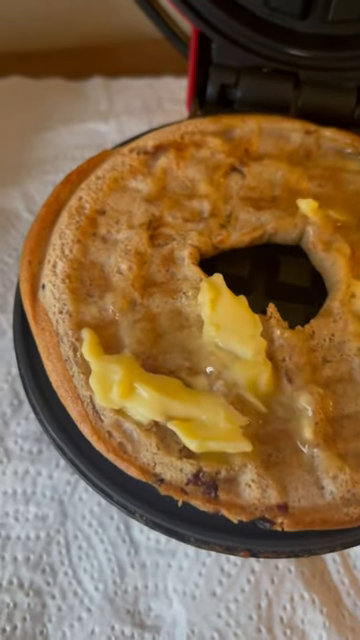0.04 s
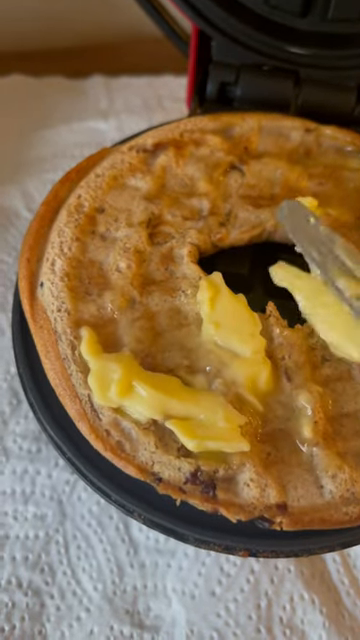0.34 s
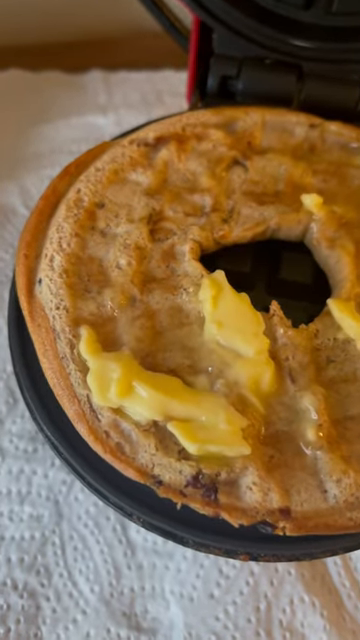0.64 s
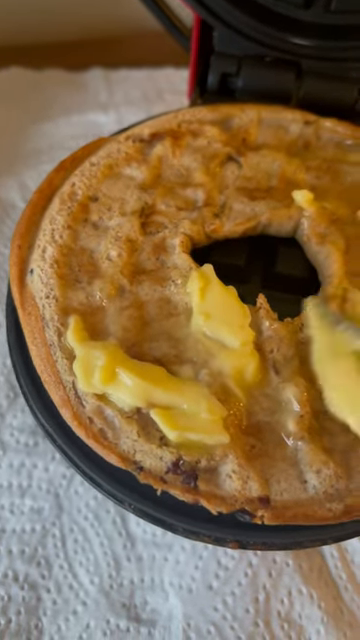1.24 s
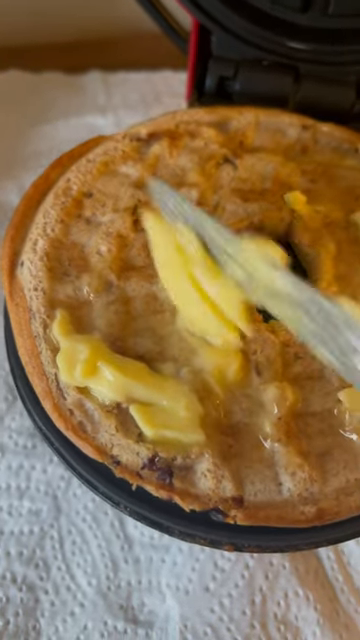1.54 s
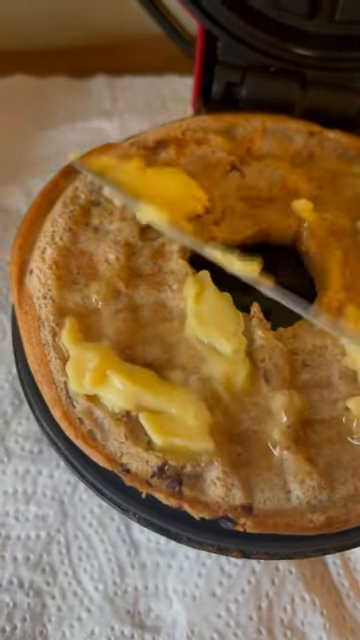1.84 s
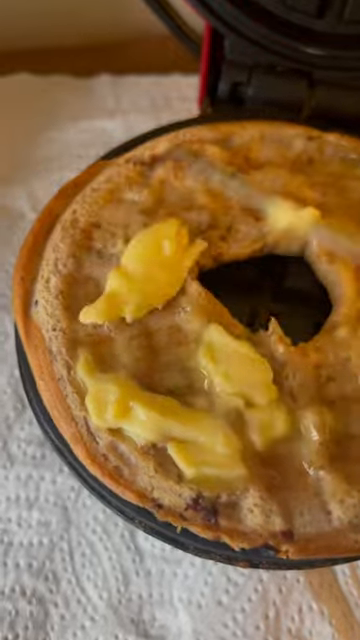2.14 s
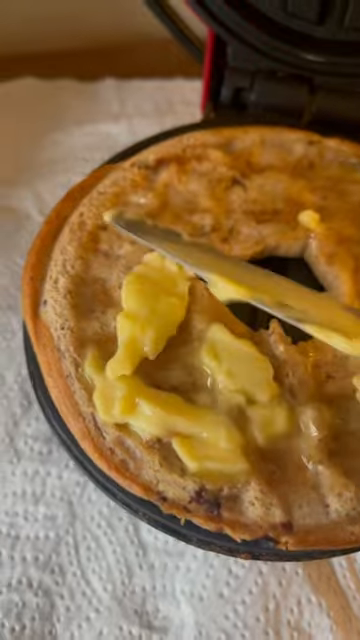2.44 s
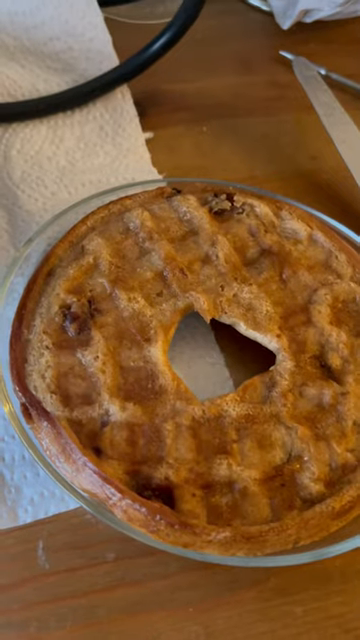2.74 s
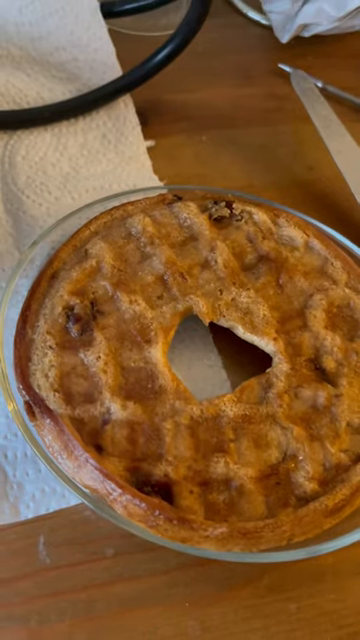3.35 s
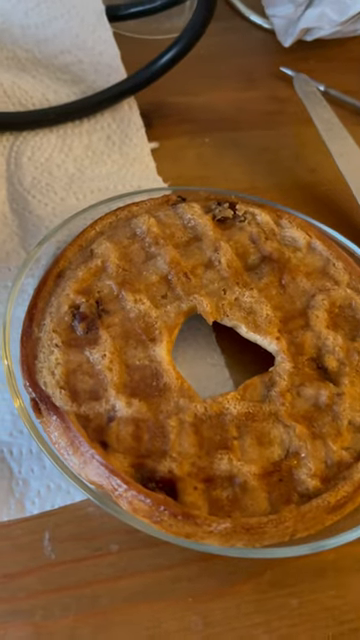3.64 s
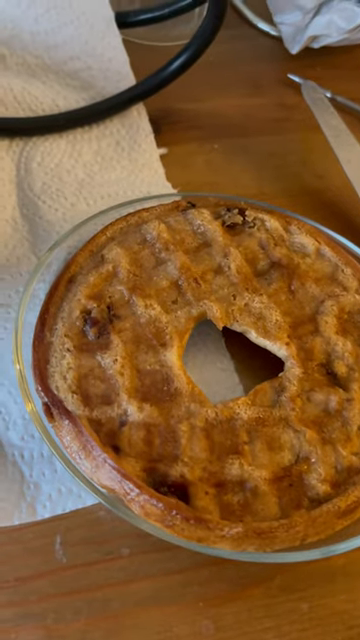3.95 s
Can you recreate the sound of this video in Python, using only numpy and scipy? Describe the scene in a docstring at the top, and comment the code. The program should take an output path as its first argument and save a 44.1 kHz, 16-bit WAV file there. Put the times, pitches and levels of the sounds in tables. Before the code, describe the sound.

Close in a quiet kitchen, a knife slides softly over a toasted bagel, then catches the crust in short crackling scrapes and small thuds. A low background hum stops, leaving faint rumble, light taps and a click.

```python
"""A small quiet kitchen, close up: a knife spreads butter over a crisp toasted bagel.
After a soft slide the blade catches the crust in short crunches and snaps; each break crackles,
thuds into the bagel and sets blade and pan ringing. Pan and table give a few dull bumps.
A low hum cuts off with a faint tick, leaving a soft rumble, a few light taps and one sharp click."""
import sys
import numpy as np
from scipy import signal
from scipy.fft import rfft, irfft
from scipy.io import wavfile

SR = 44100
rng = np.random.default_rng(int(sys.argv[2]) if len(sys.argv) > 2 else 0)


def unload_audio(sound):
    """Save the sound as a 16-bit wav file, at the path given as the first command line argument."""
    columns = np.transpose(np.atleast_2d(sound))
    # keep every value between -1 and 1, then stretch to whole-number steps
    steps = np.round(np.clip(columns, -1, 1) * 32767)
    wavfile.write(sys.argv[1], SR, steps.astype(np.int16))


N = 176400

# bright spectrum of breaking crust (frequency [Hz], level [dB])
CRUST_COLOUR = [(30, -41), (600, 2), (1000, 4), (1500, -2), (2300, 4), (4000, -2), (6300, 4), (8800, -1.5),
                (10400, 4), (11500, -6), (13800, -34.5)]
# spectrum of the blade's friction (frequency [Hz], level [dB])
FRICTION_COLOUR = [(30, -15), (150, 14.5), (700, -4), (4700, -1.5), (6200, 4), (8200, -1), (10500, -4),
                   (13000, -49)]
# spectrum of the room's soft air noise (frequency [Hz], level [dB])
AIR_COLOUR = [(400, -6.5), (650, 9), (1000, -14.5), (1500, -22.5), (10000, -27.5), (12400, -40),
              (13400, -63)]
SNAP_DECAY_S, SNAP_RISE_S = 0.00032, 0.00043
SNAP_GAIN = np.sqrt(0.0012 * SR)  # a snap carries the energy of 1.2 ms at its listed level


def amp(db):
    """Decibels to gain."""
    return 10 ** (np.asarray(db) / 20)


def unit_rms(x):
    """Scales to rms 1."""
    return x / np.sqrt(np.mean(x ** 2) + 1e-20)


def unit_energy(x):
    """Scales to energy 1."""
    return x / np.sqrt(np.sum(x ** 2) + 1e-20)


def curve_at(points, hz):
    """Reads a table on a log-frequency axis."""
    f, value = np.transpose(points)
    return np.interp(np.log(hz + 1), np.log(f + 1), value)


def add(mix, start_s, sound):
    """Mixes a sound in at a time."""
    part = mix[round(start_s * SR):][:len(sound)]
    part += sound[:len(part)]


def colour(points, tilt_db=0, size=2048):
    """Minimum-phase impulse response of a spectrum, tilted per octave above 800 Hz."""
    hz = abs(np.fft.fftfreq(size, 1 / SR))
    octaves = np.log2(np.maximum(hz, 800) / 800)
    log_gain = np.log(amp(curve_at(points, hz) + tilt_db * octaves))
    return unit_energy(np.fft.ifft(np.exp(np.conj(signal.hilbert(log_gain)))).real)


def excite(force, points, tilt_db=0):
    """A force played through a material's colour, with energy 1."""
    return unit_energy(signal.fftconvolve(force, colour(points, tilt_db)))


def noise(points):
    """Steady noise of a given colour, rms 1."""
    gain = amp(curve_at(points, np.fft.rfftfreq(N, 1 / SR)))
    return unit_rms(irfft(rfft(rng.standard_normal(N)) * gain, N))


def burst(decay_s, rise_s=1 / SR):
    """A dying puff of noise with energy 1."""
    t = np.arange(SR // 8) / SR
    return unit_energy(rng.standard_normal(len(t)) * np.minimum(t / rise_s, 1) * np.exp(-t / decay_s))


def grains(size, per_s=3200, spread_db=4):
    """Tiny fractures of very uneven strength."""
    strength = amp(spread_db * np.minimum(rng.exponential(1, size), 4))
    return strength * rng.choice([-1, 1], size) * (rng.random(size) < per_s / SR)


def stick_slip(size, depth_db=2.5, step_s=0.002):
    """The blade grips and lets go: a gain that jumps about at random, rms 1."""
    steps = np.arange(size)
    return unit_rms(amp(depth_db * np.interp(steps / SR / step_s, steps, rng.standard_normal(size))))


def ring(modes, t, t60_s):
    """Struck metal: damped sines at random phases."""
    return sum(amp(db - 60 * t / t60_s) * np.sin(2 * np.pi * (hz * t + rng.random())) for hz, db in modes)


def resonate(x, hz, width_hz):
    """A steep resonance that follows the curve hz."""
    carrier = np.exp(2j * np.pi * np.cumsum(hz) / SR)
    pole = np.exp(-np.pi * width_hz / SR)
    return (carrier * signal.lfilter([(1 - pole) ** 2], [1, -2 * pole, pole * pole], x / carrier)).real


def room_tone(hum_db=-46.5, rumble_db=-59, air_db=-69, crossfade_at_s=2.49, crossfade_s=0.021):
    """A wavering hum gives way to a faint rumble; soft air noise lies under both."""
    # spectra of the hum and the rumble (frequency [Hz], level [dB])
    hum_colour = [(22, -54), (77, -12.5), (122, -16.5), (138, 1), (152, -1), (200, -23.5), (900, -72)]
    rumble_colour = [(25, -31.5), (45, 12), (62, 1), (90, -10.5), (700, -23.5), (2500, -58)]
    # swells and dips of the hum (time [s], gain [dB])
    hum_swells = [(.18, -0.5), (.24, 5.5), (.42, 0.5), (1.2, -3), (1.38, -13.5), (1.435, 4), (1.5, -7.5),
                  (2.0, 1.5)]
    t = np.arange(N) / SR
    fade = np.clip((t - crossfade_at_s) / crossfade_s + .5, 0, 1)
    hum = amp(hum_db + np.interp(t, *np.transpose(hum_swells))) * noise(hum_colour)
    rumble = amp(rumble_db) * noise(rumble_colour)
    return (1 - fade) * hum + fade * rumble + amp(air_db) * noise(AIR_COLOUR)


def kitchen_reverb(x, tail_db=-14, rise_s=0.0034, echo_s=0.019, echo_db=-24):
    """A short diffuse tail and one wall echo."""
    # decay of the room (frequency [Hz], T60 [s])
    decay = [(150, 0.27), (4000, 0.25), (13000, 0.19)]
    hz, t, spectra = signal.stft(rng.standard_normal(SR // 2), SR, nperseg=256)
    tail = signal.istft(spectra * amp(-60 * t / curve_at(decay, hz)[:, None]), SR, nperseg=256)[1]
    onset = np.minimum(np.arange(len(tail)) / SR / rise_s, 1)
    tail = amp(tail_db) * unit_energy(tail * onset)
    tail[round(echo_s * SR)] += amp(echo_db)
    return signal.fftconvolve(x, tail)[:N]


def table_reflections(x, level_db=-4.5, smear_s=0.00047):
    """The tabletop throws back a quick, bright smear of the sound."""
    # spectrum of the reflections (frequency [Hz], level [dB])
    table_colour = [(400, -39.5), (4000, 0.5), (6500, -2)]
    response = excite(burst(smear_s, smear_s), table_colour)
    return amp(level_db) * signal.fftconvolve(x, response)[:N]


def crumbs(per_s=1300, level_db=-82.5, fade_s=1.78):
    """A faint rustle of tiny stray ticks that slowly dies away."""
    ticks = rng.uniform(-1.0, 1, N) ** 3 * (rng.random(N) < per_s / SR)
    rustle = unit_rms(signal.fftconvolve(ticks, colour(CRUST_COLOUR, tilt_db=6))[:N])
    return amp(level_db) * np.exp(-(np.arange(N) / SR / fade_s) ** 2) * rustle


def pan_bumps(decay_s=0.013, rise_s=0.003):
    """Soft knocks draw dull, low thuds from pan and table."""
    # knocks (time [s], level [dB])
    bumps = [(0.077, -41.5), (0.119, -41), (.262, -49), (1.131, -44.5), (1.812, -55.5), (2.594, -49.5),
             (3.664, -56.5)]
    # spectrum of a thud (frequency [Hz], level [dB])
    thud_colour = [(40, -7.5), (140, 8.5), (320, -10), (480, -9), (800, -41.5), (9000, -79.5)]
    out = np.zeros(N)
    for start, level_db in bumps:
        thud = excite(burst(decay_s, rise_s), thud_colour)
        add(out, start, amp(level_db) * np.sqrt(decay_s * SR) * thud)
    return out


def blade_click(tick_db=-8):
    """One bright, dry click: quickly damped modes with a tick of contact noise."""
    # the blade's strike (time [s], level [dB])
    start, level_db = (3.6622, -32.5)
    # modes of the blade (frequency [Hz], level [dB])
    blade_modes = [(1660, -18), (2760, -17), (3540, -4.5), (4370, -4.5), (5430, 4), (6250, -4), (7200, 2.5),
                   (10500, -4)]
    out, t = np.zeros(N), np.arange(SR // 20) / SR
    ping = unit_energy(ring(blade_modes, t, t60_s=0.0066) * np.minimum(t / SNAP_RISE_S, 1))
    tick = signal.fftconvolve(burst(SNAP_DECAY_S), np.diff(colour(FRICTION_COLOUR)))[:len(t)]
    click = unit_energy(ping + amp(tick_db) * unit_energy(tick))
    add(out, start, amp(level_db) * SNAP_GAIN * click)
    return out


def blade_slide(grit=0.35):
    """Finely grained friction that swells and stops before the crunching."""
    # envelope of the slide (time [s], level [dB])
    swell = [(.39, -100), (0.429, -70), (.481, -97), (.486, -65.5), (.56, -53.5), (.665, -52),
             (.705, -63.5), (.74, -72.5)]
    friction = rng.standard_normal(N) + grit * unit_rms(grains(N))
    level = amp(np.interp(np.arange(N) / SR, *np.transpose(swell), left=-np.inf, right=-np.inf))
    return level * unit_rms(signal.fftconvolve(friction, colour(FRICTION_COLOUR))[:N])


def sticky_rubs(glide_hz_per_s=1900):
    """Sticking and slipping excites resonances that drift upward as the blade moves."""
    # rasps and sizzles (peak time [s], half-width [s], level [dB], centre [Hz], bandwidth [Hz])
    rubs = [(0.507, 0.017, -64.5, 2960, 500), (0.581, 0.024, -56, 1470, 710),
            (0.652, 0.042, -58, 10500, 1590), (1.31, .045, -64.5, 2250, 1200)]
    out, t = np.zeros(N), np.arange(N) / SR
    for peak_s, width_s, level_db, centre_hz, width_hz in rubs:
        hz = centre_hz + glide_hz_per_s * np.clip(t - peak_s, -width_s, width_s)
        rasp = unit_rms(resonate(grains(N) * stick_slip(N), hz, width_hz))
        out += amp(level_db) * np.exp(-((t - peak_s) / width_s) ** 2) * rasp
    return out


def crust_crunch(attack_s=0.0019, release_s=0.0026, thud_decay_s=0.003, ring_db=-14):
    """Crust breaks under the blade; each break crackles, thuds into the bagel and rings blade and pan."""
    # drags over the crust (time [s], length [s], crackle [dB], thud [dB], crackle tilt [dB/octave])
    scrapes = [(1.014, 0.051, -67, -67, -5.5), (1.107, 0.0062, -37.5, -43, -3),
               (1.114, 0.016, -38, -54.5, -2), (1.224, 0.053, -54.5, -59, -4), (1.27, 0.11, -64.5, -66, -3),
               (1.8, 0.013, -47.5, -44.5, 0), (1.83, 0.027, -49, -55, -3), (1.842, 0.016, -49, -43, -1),
               (1.882, 0.013, -49, -51, 0.5), (1.895, 0.046, -56.5, -54, -3),
               (1.929, 0.024, -49.5, -47, -4), (1.947, 0.026, -46.5, -45, -0.5),
               (1.977, 0.0207, -54.5, -40, -3), (2.299, 0.0098, -57.5, -65, -5)]
    # single crust snaps and blade taps, plus one faint tick as the hum cuts off
    # (time [s], crackle [dB], crackle tilt [dB/octave], thud [dB])
    snaps = [(0.867, -54, 4, -74.5), (.939, -46.5, -6, -65.5), (1.111, -37.5, 12.5, -48),
             (1.119, -30, 6.5, -37.5), (1.131, -33.5, -12, -31.5), (1.238, -43.5, -4.5, -66),
             (1.243, -41.5, -3.5, -60), (1.252, -43, 0, -46), (1.261, -49, -9, -57),
             (1.367, -46.5, -1.5, -60), (1.8088, -33.5, 2.5, -59), (1.834, -42.5, -3, -62),
             (1.857, -41, 4, -42), (1.8751, -37.5, -1, -61), (1.935, -37.5, -0.5, -38.5),
             (1.941, -33.5, -5, -30), (1.949, -42.5, 8, -33.5), (1.958, -43, 5, -36),
             (1.963, -41.5, -3.5, -38), (1.971, -47, 0, -34), (1.988, -38.5, -1.5, -62),
             (1.9995, -48, -4, -43), (2.102, -47, 7, -71), (2.173, -61.5, 1, -64), (2.312, -45, -2.5, -40),
             (2.326, -49.5, 5, -60), (2.484, -63, -5, -68), (2.595, -49.5, -31, -60),
             (3.692, -53.5, 7, -80), (3.977, -47.5, -6.5, -74)]
    # dull spectrum of the bagel's body (frequency [Hz], level [dB])
    bagel_colour = [(25, -41.5), (70, -3.5), (200, -3), (520, 7), (950, -6.5), (3000, -22.5), (8000, -62)]
    # modes of blade and pan (frequency [Hz], level [dB])
    metal_modes = [(428, 0.5), (548, -2), (940, -0.5), (1285, -1.5), (1448, -2), (2133, -4.5), (2279, -5),
                   (2700, -9.5), (3330, -6), (5420, -6.5), (6570, 0.5)]
    crackle, thud, t = np.zeros(N), np.zeros(N), np.arange(SR // 6) / SR
    for start, length, crackle_db, thud_db, tilt_db in scrapes:
        force = np.minimum(t / attack_s, 1) * np.exp(-np.maximum(t - length, 0) / release_s)
        breaks = grains(len(t)) * force * stick_slip(len(t))
        length_gain = np.sqrt(length * SR)
        add(crackle, start, amp(crackle_db) * length_gain * excite(breaks, CRUST_COLOUR, tilt_db))
        add(thud, start, amp(thud_db) * length_gain * excite(breaks, bagel_colour))
    for start, crackle_db, tilt_db, thud_db in snaps:
        snap = excite(burst(SNAP_DECAY_S, SNAP_RISE_S), CRUST_COLOUR, tilt_db)
        add(crackle, start, amp(crackle_db) * SNAP_GAIN * snap)
        add(thud, start, amp(thud_db) * SNAP_GAIN * excite(burst(thud_decay_s), bagel_colour))
    metal = unit_energy(ring(metal_modes, t, t60_s=0.07))
    return crackle + thud + amp(ring_db) * signal.fftconvolve(crackle, metal)[:N]


def scene(reverb_width=0.7, side_air_db=-79):
    """Knife and room sit in the centre; table reflections, reverb and air add stereo width."""
    near = crust_crunch() + pan_bumps() + blade_click() + blade_slide() + sticky_rubs() + crumbs()
    mid = near + kitchen_reverb(near) + room_tone()
    side = table_reflections(near) + reverb_width * kitchen_reverb(near)
    side += amp(side_air_db) * noise(AIR_COLOUR)
    return np.array([mid + side, mid - side])


def record(dry, centred_below_hz=424, cutoff_hz=14700, fade_in_s=0.005):
    """The microphone pair shifts phase and balance above the bass and cuts the top treble."""
    # phase between the microphones (frequency [Hz], left lead [rad])
    phase = [(1100, -.6), (1350, .2), (2650, .3), (3300, 2.2), (4500, 2.6), (6000, 6.3), (12000, 12.55)]
    # balance between the microphones (frequency [Hz], left minus right [dB])
    balance = [(600, 0.5), (1050, -6), (1500, 2.5), (2400, 1), (3100, -4.5), (3700, 11), (6000, -1.5)]
    hz = np.fft.rfftfreq(2 * N, 1 / SR)
    width = 1 - np.exp(-(hz / centred_below_hz) ** 2)
    left = amp(width * curve_at(balance, hz) / 2) * np.exp(.5j * width * curve_at(phase, hz))
    heard = irfft(rfft(dry, 2 * N) * np.array([left, 1 / left]))[:, :N]
    heard *= np.minimum(np.arange(N) / SR / fade_in_s, 1)
    lowpass = signal.firwin(255, cutoff_hz, window=("kaiser", 8), fs=SR)
    return signal.oaconvolve(heard, lowpass[None], "same")


dry = scene()
out = record(dry)
unload_audio(out)
```